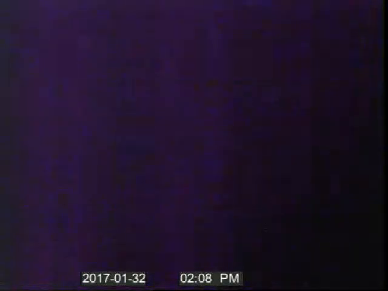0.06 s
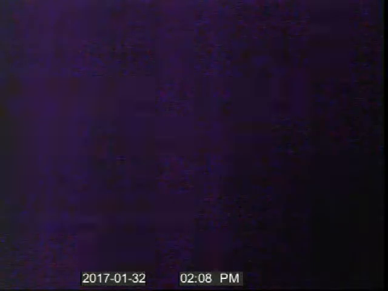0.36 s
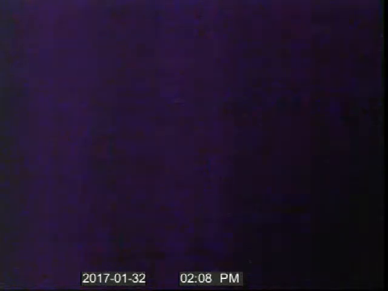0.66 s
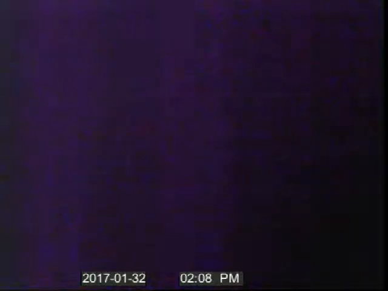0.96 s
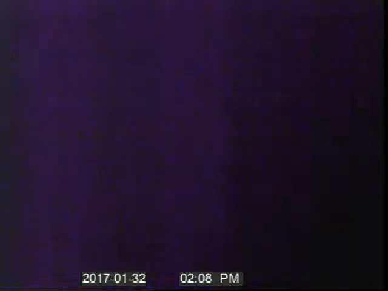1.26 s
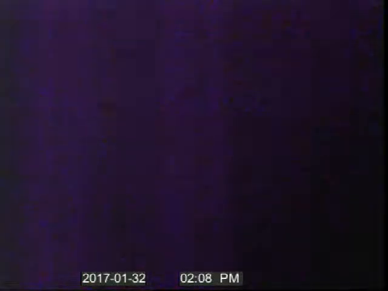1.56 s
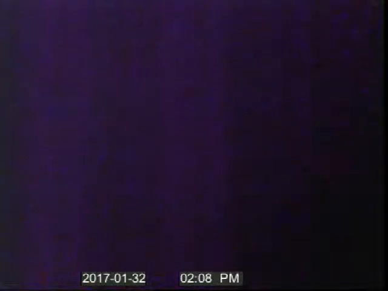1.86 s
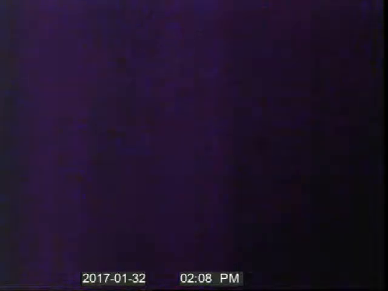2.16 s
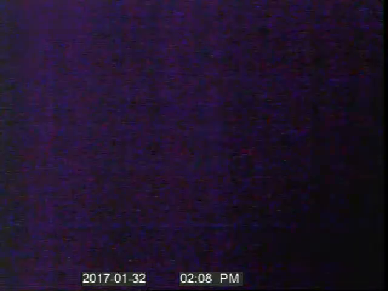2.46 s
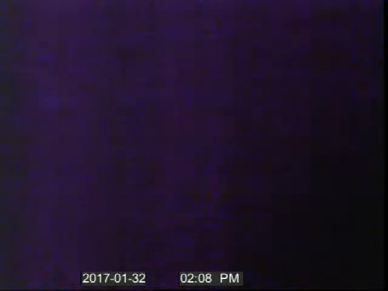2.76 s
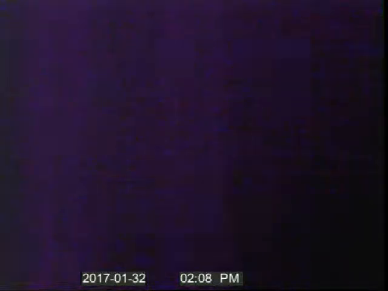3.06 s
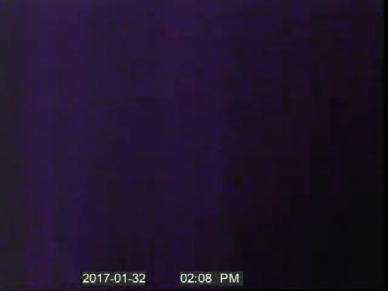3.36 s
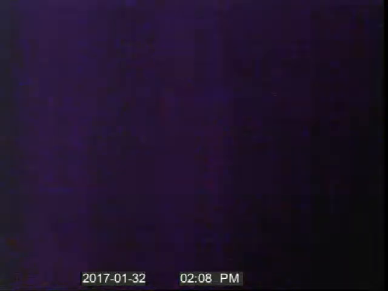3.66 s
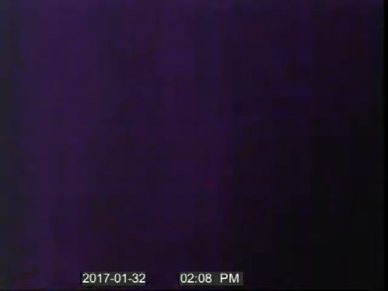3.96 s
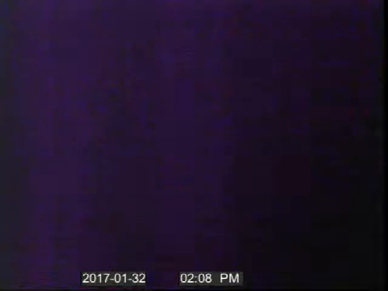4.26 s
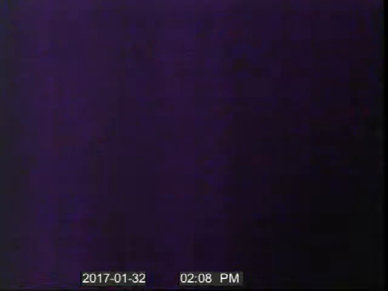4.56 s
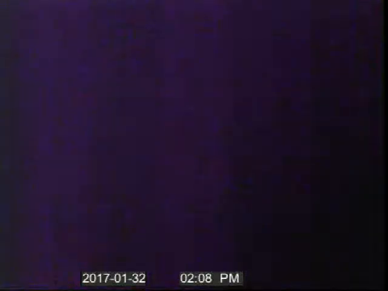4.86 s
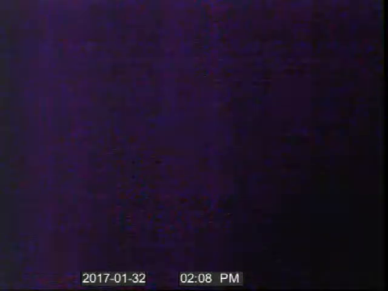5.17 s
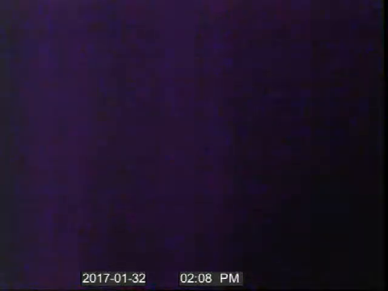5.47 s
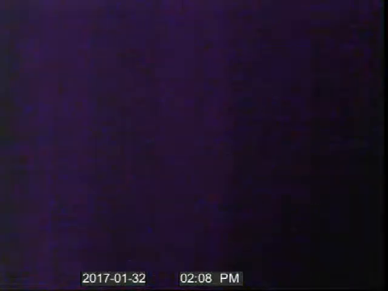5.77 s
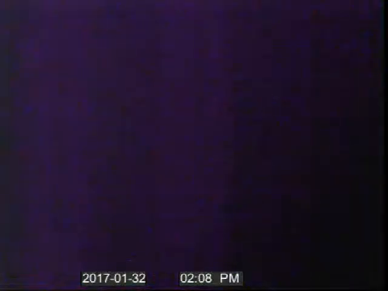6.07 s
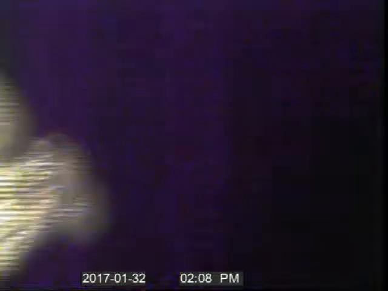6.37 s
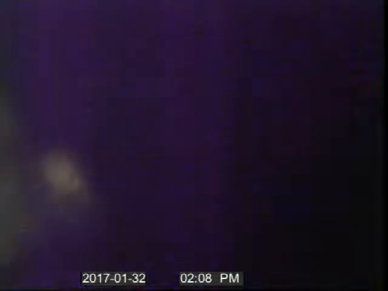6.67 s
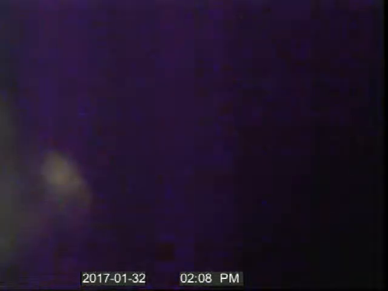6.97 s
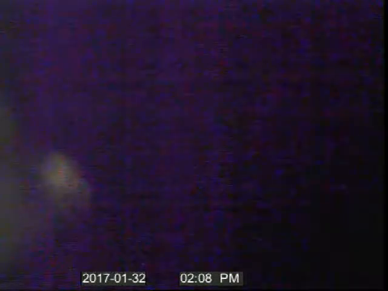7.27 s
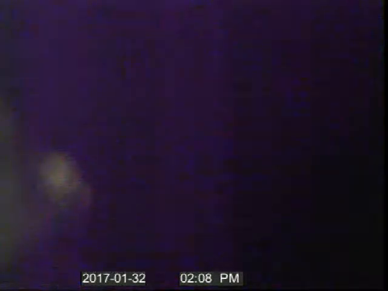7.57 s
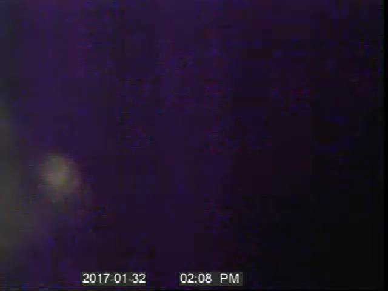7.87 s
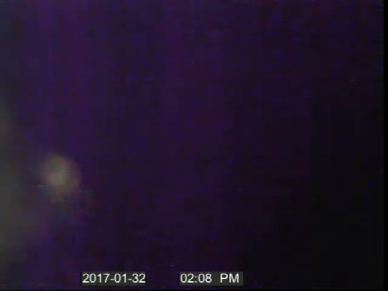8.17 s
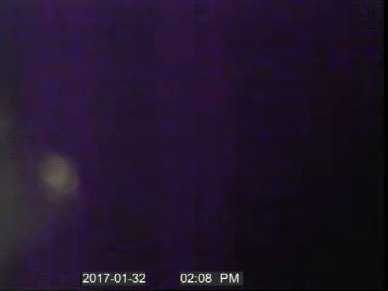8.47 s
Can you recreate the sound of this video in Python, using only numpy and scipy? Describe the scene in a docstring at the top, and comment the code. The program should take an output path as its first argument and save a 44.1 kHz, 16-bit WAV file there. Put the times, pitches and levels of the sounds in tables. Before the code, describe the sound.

Close handling noise of an inspection camera cable being fed along: scratchy rustles, clicks and deep thumps over steady hiss and low rumble.

```python
"""A cable rustles, ticks and scrapes as an inspection camera is fed along by hand.
Its stick-slip friction reaches the microphone through the monitor case, whose resonances colour it.
Knocks set the case's modes ringing; the heaviest bumps boom and overload the input.
Under it all lie hiss, low rumble, mains hum and a thin, pulsing electronic whine."""
import sys
import numpy as np
from scipy import signal
from scipy.fft import rfft, irfft
from scipy.io import wavfile
from scipy.ndimage import uniform_filter1d

SR = 44100
rng = np.random.default_rng(int(sys.argv[2]) if len(sys.argv) > 2 else 0)


def generate_wav(signal):
    """Clip the signal to [-1, 1] and save it as 16-bit WAV at the path in sys.argv[1]."""
    frames = np.transpose(np.atleast_2d(signal))
    scaled = np.clip(frames, -1, 1) * 32767
    pcm = np.round(scaled).astype(np.int16)
    wavfile.write(sys.argv[1], SR, pcm)


N = 384111
T = np.arange(N) / SR
BIN_HZ = np.fft.rfftfreq(N, 1 / SR)


def amplitude(db):
    """Amplitude ratio: a factor of ten for every 20 dB."""
    return 10 ** (np.asarray(db) / 20)


def unit_rms(x):
    """Normalisation to a mean power of one."""
    return x / np.sqrt(np.mean(x ** 2) + 1e-20)


def spectrum_db(points, hz):
    """Interpolation of a spectrum on a log-frequency axis."""
    f, db = np.transpose(points)
    return np.interp(np.log(hz + 1), np.log(f + 1), db)


def add(mix, start, sound):
    """Superposition of a sound on the mix, from a start in seconds."""
    part = mix[max(round(start * SR), 0):][:len(sound)]
    part += sound[:len(part)]


def coloured(noise, spectrum):
    """Spectral shaping of a noise, at unit rms."""
    return unit_rms(irfft(rfft(noise) * amplitude(spectrum_db(spectrum, BIN_HZ)), N))


def wobble(rate_hz):
    """Slow random modulation: low-passed noise at unit rms."""
    return unit_rms(irfft(rfft(rng.standard_normal(N)) * np.exp(-(BIN_HZ / rate_hz) ** 2), N))


# Spectra of the steady noises. Each row: frequency in Hz, relative density in dB.
HISS_SPECTRUM = [(200, 6.5), (500, 10), (750, 3.5), (1100, -0.5), (1750, -4), (2600, 0), (3050, 1.5),
                 (3500, -2), (6000, -3.5), (8000, -1), (11000, -5)]
RUMBLE_SPECTRUM = [(8, -6.5), (22, -5), (32, 0.5), (45, -0.5), (85, 0.5), (120, -6.5), (170, -9.5),
                   (200, -15.5), (260, -18.5), (400, -32.5), (600, -53)]
def noise_floor(hiss_db=-57.5, rumble_db=-41):
    """Stationary Gaussian noise: a broad hiss over a low rumble."""
    hiss = amplitude(hiss_db) * coloured(rng.standard_normal(N), HISS_SPECTRUM)
    rumble = amplitude(rumble_db) * coloured(rng.standard_normal(N), RUMBLE_SPECTRUM)
    return hiss + rumble


# Mains hum and picture-rate buzz. Each row: frequency in Hz, rms level in dB.
HUM_PARTIALS = [(29.97, -42.5), (59.94, -43.5), (179.8, -62.5), (299.7, -68.5), (359.6, -70.5),
                (419.6, -84)]
def hum():
    """Periodic interference has a line spectrum: a sum of steady sinusoids."""
    return sum(np.sqrt(2) * amplitude(db) * np.sin(2 * np.pi * (hz * T + rng.random()))
               for hz, db in HUM_PARTIALS)


def whine(db=-62, hz=5653.3, pulse_hz=22.256, lag_cycles=0.372):
    """Amplitude modulation: a smoothed square wave switches an electronic tone on and off."""
    switched_on = np.cos(2 * np.pi * (pulse_hz * T - lag_cycles)) > 0
    gate = uniform_filter1d(switched_on.astype(float), size=60)
    return amplitude(db) * gate * np.sin(2 * np.pi * hz * T)


# Resonances of the case housing. Each row: centre in Hz, width in Hz, gain in dB.
HOUSING_RESONANCES = [(781, 130, 5.5), (1344, 97, 6), (1716, 120, 7.5), (2157, 174, 12), (3013, 390, 13),
                      (4240, 680, 5), (7120, 160, 8), (8740, 1220, 10), (10200, 390, 9.5)]
def housing(spectrum, rings=(), size=4096):
    """Minimum-phase impulse response, at unit energy: a click's spectrum shaped by resonances."""
    hz = abs(np.fft.fftfreq(size, 1 / SR))
    peaks_db = sum(db / (1 + (2 * (hz - centre) / width) ** 2)
                   for centre, width, db in [*HOUSING_RESONANCES, *rings])
    log_magnitude = np.log(amplitude(spectrum_db(spectrum, hz) + peaks_db))
    transfer = np.exp(np.conj(signal.hilbert(log_magnitude)))
    response = np.fft.ifft(transfer).real[:size // 2]
    return response / np.linalg.norm(response)


def slips(per_s, spread_db):
    """Stick-slip motion as a Poisson train of impulses, at unit rms."""
    size = amplitude(spread_db * np.minimum(rng.exponential(1, N), 4))
    return unit_rms(size * rng.choice([-1., 1.], N) * (rng.random(N) < per_s / SR))


def friction(spectrum, rings=(), *, per_s, spread_db, clump_db=3):
    """Source and filter: slips, swelling in clumps, ring through the housing; unit rms."""
    drive = slips(per_s, spread_db) * amplitude(clump_db * wobble(rate_hz=83))
    return unit_rms(signal.oaconvolve(drive, housing(spectrum, rings))[:N])


# Spectra of cable rustle, case groan and hand rub. Each row: frequency in Hz, relative density in dB.
RUSTLE_SPECTRUM = [(300, -27), (1200, -6.5), (2000, -6), (3000, -0.5), (4500, -0.5), (6000, -2.5),
                   (11000, -9)]
GROAN_SPECTRUM = [(60, -2), (100, 2), (155, 3.5), (220, -6), (260, -15.5), (390, -13.5), (435, -19.5),
                  (490, -17), (600, -38.5), (1500, -49.5)]
RUB_SPECTRUM = [(250, -20), (500, -5.5), (1000, 2), (1800, -1.5), (2400, -7.5), (3200, -23), (6000, -21),
                (11000, -38)]
# Resonances under a light slide. Each row: centre in Hz, width in Hz, gain in dB.
SLIDE_RESONANCES = [(2220, 200, 6), (3100, 140, 4.5)]
# Levels with the hand at rest: rustle, groan and rub in dB.
HAND_AT_REST_DB = (-65, -48.5, -65)
# Feeding strokes. Each row: start, fastest moment and end in seconds, then rustle, groan and rub in dB.
HAND_STROKES = [(-0.15, 0.172, 0.45, -48, -38, -53.5), (1.298, 1.571, 1.85, -59.5, -45, -61.5),
                (1.955, 2.136, 2.33, -58.5, -32.5, -54.5), (2.459, 2.72, 2.95, -58.5, -42, -64),
                (3.353, 3.77, 3.98, -72, -44, -64), (3.97, 4.135, 4.4, -63, -35, -57),
                (4.347, 4.729, 5, -65.5, -35.5, -54), (5.02, 5.451, 5.75, -61, -36, -54),
                (5.581, 5.782, 6.1, -56, -44.5, -63), (5.954, 6.149, 6.6, -64.5, -42, -58.5),
                (6.246, 6.441, 6.55, -54, -30.5, -63), (6.509, 6.608, 6.72, -66, -32.5, -52),
                (6.7, 6.912, 7.2, -62.5, -44.5, -62), (7.95, 8.124, 8.5, -65, -46.5, -60.5),
                (8.301, 8.6, 8.6, -55, -32.5, -53)]
def handling(sharpness=1.26):
    """Friction noise grows with sliding speed: the cable rustles, the hand rubs, the case groans."""
    t = T[::100]
    power = amplitude(HAND_AT_REST_DB)[:, None] ** 2 * np.ones(len(t))
    for start, fastest, end, *levels_db in HAND_STROKES:
        speed = np.sin(np.pi / 2 * np.interp(t, [start, fastest, end], [0, 1, 0])) ** sharpness
        power += np.outer(amplitude(levels_db), speed) ** 2  # incoherent sounds add in power
    rustle, groan, rub = (np.interp(T, t, np.sqrt(p)) for p in power)
    return (rustle * friction(RUSTLE_SPECTRUM, SLIDE_RESONANCES, per_s=900, spread_db=4.5)
            + rub * friction(RUB_SPECTRUM, per_s=1500, spread_db=2.5, clump_db=4)
            + groan * coloured(slips(per_s=500, spread_db=3), GROAN_SPECTRUM))


# Cable squeaks. Each row: start and end in seconds, centre and half-width in Hz, top rms level in dB.
CABLE_SQUEAKS = [(0.0, 0.29, 3150, 160, -49.5), (0.07, 0.284, 2170, 80, -49), (3.6, 4.4, 1900, 400, -63.5),
                 (5.68, 5.858, 3060, 200, -56.5), (6.394, 6.476, 1730, 120, -38),
                 (6.833, 7.133, 2200, 185.2, -60), (7.01, 7.335, 1610, 130.1, -63.5),
                 (8.536, 8.66, 2145, 110, -34.5), (8.565, 8.63, 720, 130, -32.5)]
def squeaks():
    """Narrow-band resonance: light slips excite a single pitch for a moment."""
    out = np.zeros(N)
    drive = rfft(slips(per_s=600, spread_db=1))
    for start, end, hz, half_width, db in CABLE_SQUEAKS:
        ring = irfft(drive / (1 + 1j * (BIN_HZ - hz) / half_width) ** 2, N)
        swell = np.sin(np.pi * np.clip((T - start) / (end - start), 0, 1))
        out += amplitude(db) * unit_rms(ring) * swell
    return out


# Spectrum of a scrape. Each row: frequency in Hz, relative density in dB.
SCRAPE_SPECTRUM = [(150, 19), (400, 2.5), (800, -1.5), (1700, -4.5), (2600, -2.5), (3200, -6), (4500, -4.5),
                   (6000, -9), (11000, -16)]
# Its peaks and notches. Each row: centre in Hz, width in Hz, gain in dB.
SCRAPE_RESONANCES = [(243, 50, 2.5), (350, 92, 3.5), (770, 370, 8.5), (1120, 110, -20), (2880, 280, -4)]
# Scrapes over the case. Each row: start, crest and end in seconds, level in dB, ring in Hz, depth in dB.
CABLE_SCRAPES = [(2.073, 2.135, 2.13, -35.5, 2990, -11), (5.347, 5.41, 5.48, -44, 4550, -12),
                 (6.324, 6.426, 6.51, -24.5, 1720, 3.5), (6.534, 6.6, 6.65, -37.5, 2100, -5.5),
                 (8.513, 8.606, 8.665, -21, 1980, 8.5), (8.681, 8.693, 8.78, -20, 2170, 7)]
def scrapes(fade_db=19, ring_db=6, ring_width_hz=280):
    """Friction under load: grit swells until the cable comes free; heavy pressure sounds deeper."""
    out = np.zeros(N)
    for start, crest, end, db, hz, depth_db in CABLE_SCRAPES:
        swell_db = np.interp(T, [start, crest, end], [-fade_db, 0, -fade_db])
        force = amplitude(db + swell_db) * (T > start) * (T < end)
        rings = [*SCRAPE_RESONANCES, (hz, ring_width_hz, ring_db), (400, 1200, depth_db)]
        out += force * friction(SCRAPE_SPECTRUM, rings, per_s=2200, spread_db=0)
    return out


def stray_ticks(per_stroke=2, above_rustle_db=17, spread_db=3, low_db=-18, treble_db=-12):
    """Isolated slips: rows of faint ticks near each stroke's fastest moment, scaled to its rustle."""
    rows = []
    for start, fastest, end, rustle_db, _, _ in HAND_STROKES:
        for when, size, pitch in rng.random((per_stroke, 3)):
            offset = (np.interp(when, [0, .5, 1], [start, fastest, end]) - fastest) / 2
            db = min(rustle_db + above_rustle_db, -36) + spread_db * (2 * size - 1)
            ring_hz = np.interp(pitch, [0, 1], [2000, 3200])
            rows.append((fastest + offset, db, low_db, treble_db, ring_hz))
    return rows


# Spectrum of a tick. Each row: frequency in Hz, relative density in dB.
TICK_SPECTRUM = [(200, -26.5), (600, 12.5), (1500, 4.5), (2600, -2.5), (3600, -6.5), (4500, -3), (6000, 2),
                 (8500, -5.5), (11000, -9.5)]
# Cable ticks. Each row: start in seconds, level in dB, bass and treble gains in dB, contact ring in Hz.
CABLE_TICKS = [(0.0596, -35, -25, -11, 3240), (0.0915, -23.5, -44, -21, 3240), (0.1615, -33, -7, -14, 2160),
               (0.219, -34, -22, -14, 3070), (0.2676, -32.5, -17, -24, 3040),
               (0.344, -31.5, -16, -10, 3200), (0.4585, -36, -7, -4, 3013), (0.5586, -34.5, -31, -8, 3160),
               (0.6988, -41, -21, -18, 3250), (0.7577, -28.5, -6, -3, 3100), (0.7948, -36, -6, -5, 3280),
               (0.9832, -42.5, -2, -12, 1700), (1.4462, -37.5, -24, -25, 3080),
               (1.486, -39.5, -7, -25, 1430), (1.6005, -39, -17, -9, 3140), (1.634, -37, -8, -7, 3000),
               (1.716, -37, -33, -1, 3240), (2.0103, -38.5, -23, -5, 3280), (2.0964, -30.5, 8, -11, 2140),
               (2.152, -29.5, -4, 0, 2940), (2.191, -36, -2, -17, 2070), (2.331, -28.5, 7, -27, 1690),
               (2.4598, -35.5, 4, -16, 3140), (2.4944, -39.5, -3, -6, 2270),
               (2.6198, -32.5, -19, -16, 3200), (2.6872, -30.5, -1, -4, 1700),
               (2.7044, -32.5, -13, -10, 1710), (3.3196, -39.5, -2, -8, 1710), (3.8074, -37, 18, -15, 1720),
               (3.892, -36.5, 2, -11, 1380), (4.0566, -23, -8, -5, 2300), (4.0994, -29, -4, -13, 1700),
               (4.266, -39, -11, -16, 1380), (4.4332, -34.5, -8, -6, 2100), (4.6099, -36.5, -5, -27, 1510),
               (4.668, -31, -6, -10, 1460), (4.7092, -30, -5, -5, 2140), (4.8457, -35, -11, -13, 2120),
               (5.4031, -22.5, -10, 8, 1950), (5.4444, -31, -1, -18, 1400), (5.6596, -33, -7, -35, 1765),
               (5.706, -35, -5, -7, 1680), (5.7397, -34.5, -14, -9, 3005), (5.7943, -29.5, -7.5, -7, 3088),
               (5.8905, -44, -11, -3, 3055), (6.2551, -34, -5, -7, 2080), (6.3185, -22.5, -10, -5.5, 2090),
               (6.3879, -30, -4, -15, 3100), (6.4133, -23, -12, -9, 3050), (6.4433, -22.5, -19, -20, 2720),
               (6.4906, -26, -5, -12, 3360), (6.5924, -28.5, -8.5, -26, 2980), (6.7795, -36.5, 3, -4, 3140),
               (6.8305, -32, 5, -12, 3185), (6.8513, -37.5, -16, -9, 2190), (6.9017, -39, 3, -4, 2160),
               (8.0183, -38.5, -26, -8, 2240), (8.2546, -29, 16, -23, 1370), (8.4408, -36.5, -37, -2, 1640),
               (8.4888, -30, 12, -17, 2130)]
def ticks(rise_s=0.0011, chatter_s=0.0036, tail_s=0.051, tail_gain=0.046, ring_width_hz=380):
    """Transient excitation: a few milliseconds of contact chatter ring through the housing."""
    out, t = np.zeros(N), np.arange(SR // 16) / SR
    envelope = (np.exp(-t / chatter_s) + tail_gain * np.exp(-t / tail_s)) * (1 - np.exp(-t / rise_s))
    for start, level_db, low_db, treble_db, hz in [*CABLE_TICKS, *stray_ticks()]:
        tilt = [(1200, low_db), (1800, 0), (4500, 0), (6000, treble_db)]
        spectrum = [(f, db + spectrum_db(tilt, f)) for f, db in TICK_SPECTRUM]
        ring_db = 5 + 0.42 * max(-low_db, 0)  # thinner ticks ring more
        response = housing(spectrum, [(hz, ring_width_hz, ring_db)])
        tick = signal.fftconvolve(rng.standard_normal(len(t)) * envelope, response)
        add(out, start, amplitude(level_db) * tick * np.linalg.norm(envelope) / np.linalg.norm(tick))
    return out


# Hollow taps. Each row: start in seconds, level in dB, pitch in Hz, 60 dB decay time in seconds.
HOLLOW_TAPS = [(2.103, -39, 374, 0.089), (2.392, -32.5, 364, 0.053), (4.436, -37, 390.4, 0.13),
               (5.61, -38, 371, 0.071), (8.114, -38, 403, 0.053), (8.2552, -25, 408, 0.047)]
def taps(rise_s=0.0018):
    """Damped free vibration: one main mode between two weaker ones."""
    out, t = np.zeros(N), np.arange(SR // 6) / SR
    for start, db, hz, t60 in HOLLOW_TAPS:
        ring = sum(amplitude(mode_db - 60 * t / t60) * np.sin(2 * np.pi * (hz * ratio * t + rng.random()))
                   for ratio, mode_db in [(.76, 0), (1, 4), (1.3, -10)])
        add(out, start, amplitude(db) * ring * (1 - np.exp(-t / rise_s)))
    return out


# Upper modes of the case. Each row: frequency in Hz, relative level in dB, 60 dB decay time in seconds.
CASE_MODES = [(227.6, 0.5, 0.13), (295, 2.5, 0.05), (381, 3.5, 0.098), (478, -0.5, 0.069),
              (749, -19, 0.069)]
# Light knocks. Each row: start in seconds, level in dB, gain of the upper modes in dB, lowest mode in Hz.
CASE_KNOCKS = [(0.188, -22, -15, 149), (0.256, -25.5, -16, 145), (1.488, -28.5, -17.5, 140),
               (2.098, -19.5, -14, 194), (3.889, -31, -2.5, 177), (4.063, -15.5, -16, 136.3),
               (4.098, -14.5, -14.5, 145.2), (4.267, -22.5, -19, 154), (4.433, -32.5, -1.5, 108.9),
               (4.511, -25.5, -20, 143), (4.621, -25, -14.5, 162), (4.678, -19.5, -18, 170.5),
               (4.714, -24, -16, 167.5), (4.812, -22.5, -21, 147), (4.872, -21, -15, 138),
               (5.317, -28, -11, 161), (5.384, -21, -19, 134), (5.409, -17, -20, 155),
               (5.512, -19.5, -23, 137), (5.563, -22, -15.5, 152), (5.79, -31, -13, 111),
               (5.901, -29.5, -11, 153), (6.257, -27.5, -12, 152), (6.321, -21, -14, 141.4),
               (6.364, -18.5, -22, 144), (6.565, -21.5, -21, 157), (6.61, -19, -23, 123),
               (6.649, -25.5, -17.5, 113), (7.627, -32, -12, 157.2), (8.117, -28, -6, 108)]
def knocks(rise_s=0.004, body_t60=0.2, pair_ratio=1.152, pair_db=-7):
    """Modal superposition: two close low modes beat; harder contact brings out the upper ones."""
    out, t = np.zeros(N), np.arange(SR // 4) / SR
    for start, level_db, hardness_db, hz in CASE_KNOCKS:
        phase = 2 * np.pi * hz * t
        pair = np.sin(phase) + amplitude(pair_db) * np.sin(pair_ratio * phase)
        ring = amplitude(-60 * t / body_t60) * pair
        for mode_hz, db, t60 in CASE_MODES:
            cycles = mode_hz * (1 + 0.02 * rng.standard_normal()) * t + rng.random()
            ring += amplitude(db + hardness_db - 60 * t / t60) * np.sin(2 * np.pi * cycles)
        add(out, start, amplitude(level_db) * ring * (1 - np.exp(-t / rise_s)))
    return out


# Spectrum of the crunching contact. Each row: frequency in Hz, relative density in dB.
CRUNCH_SPECTRUM = [(100, -10), (220, 11), (400, -0.5), (700, -12), (1300, -18.5), (2500, -33.5),
                   (5000, -37), (11000, -57)]
# Heavy bumps. Each row: start in seconds, level in dB, pitch in Hz, build-up time in seconds,
# 60 dB decay time in seconds, crunch level in dB.
CASE_BUMPS = [(2.144, -13, 113.6, 0.017, 0.088, -49), (2.2789, 1, 96.16, 0.032, 0.1, -16),
              (2.694, -11, 107.7, 0.015, 0.13, -35), (2.855, -8, 105.4, 0.015, 0.079, -28),
              (2.885, -0.5, 87.5, 0.015, 0.08, -26.5), (2.924, -23, 51, 0.011, 0.27, -60),
              (6.417, -14, 97, 0.013, 0.12, -49), (6.467, -12.5, 112.6, 0.019, 0.14, -48),
              (8.375, -2.5, 104.4, 0.013, 0.16, -24), (8.55, -9, 104.5, 0.014, 0.14, -24.5),
              (8.586, -8.5, 109, .035, 0.12, -19), (8.688, -13.5, 122.6, 0.013, 0.18, -21)]
def bumps(wander=0.03, overtone_db=-25, linger_db=-24, linger_t60=0.4, crunch_t60=0.097):
    """Forced, then free vibration: a crunching push builds a deep boom that drops fast, then lingers."""
    boom, contact, t = np.zeros(N), np.zeros(N), np.arange(SR // 3) / SR
    for start, db, hz, build_s, t60, crunch_db in CASE_BUMPS:
        push = np.sin(np.pi / 2 * np.minimum(t / build_s, 1))
        free_s = np.maximum(t - build_s, 0)
        drift = unit_rms(uniform_filter1d(rng.standard_normal(len(t)), size=500))
        phase = 2 * np.pi * np.cumsum(hz * (1 + wander * drift)) / SR
        swing = np.sin(phase) + amplitude(overtone_db) * np.sin(1.49 * phase)
        decay = amplitude(-60 * free_s / t60) + amplitude(linger_db - 60 * free_s / linger_t60)
        add(boom, start, amplitude(db) * push * decay * swing)
        add(contact, start, push * amplitude(crunch_db - 60 * free_s / crunch_t60))
    return boom + contact * friction(CRUNCH_SPECTRUM, per_s=4000, spread_db=2)


def scene():
    """Linear superposition: impacts, friction and background sum in one channel."""
    impacts = bumps() + knocks() + taps()
    sliding = ticks() + scrapes() + squeaks() + handling()
    background = noise_floor() + hum() + whine()
    return (impacts + sliding + background)[None]


def record(dry, rails=(-0.28, 0.263), cutoff_hz=11200):
    """Hard clipping flattens the heavy bumps at the input; a low-pass filter then limits the band."""
    lowpass = signal.firwin(255, cutoff_hz, window=("kaiser", 8), fs=SR)
    return signal.oaconvolve(np.clip(dry, *rails), lowpass[None], "same")


dry = scene()
out = record(dry)
generate_wav(out)
```